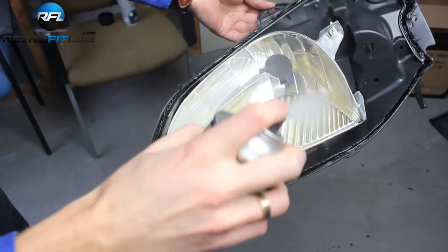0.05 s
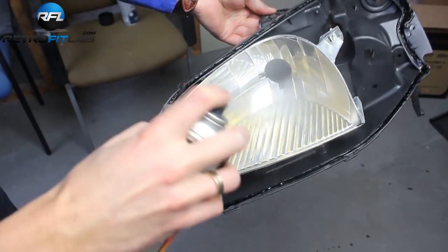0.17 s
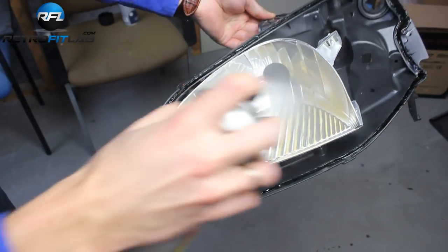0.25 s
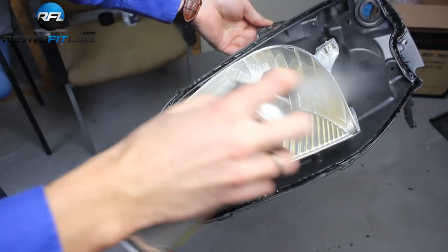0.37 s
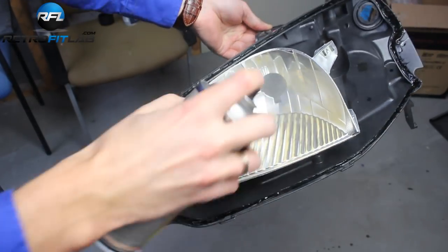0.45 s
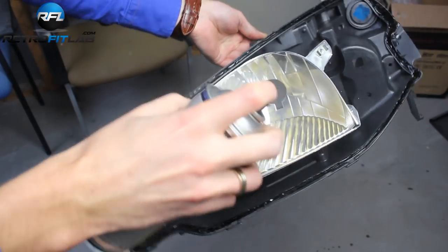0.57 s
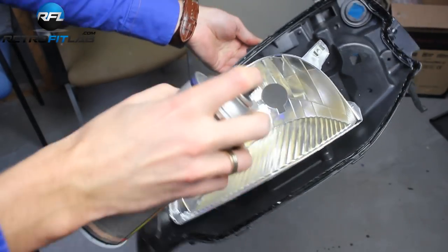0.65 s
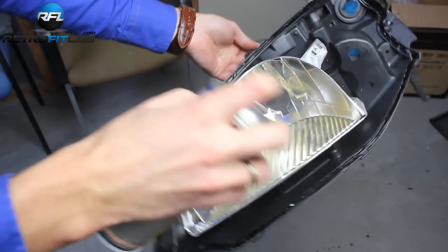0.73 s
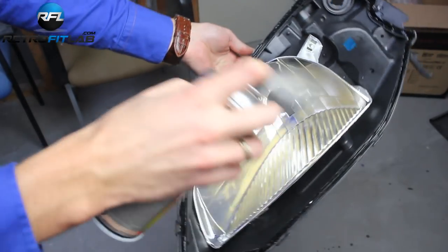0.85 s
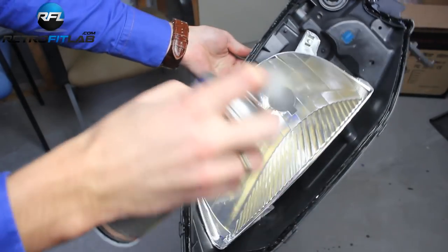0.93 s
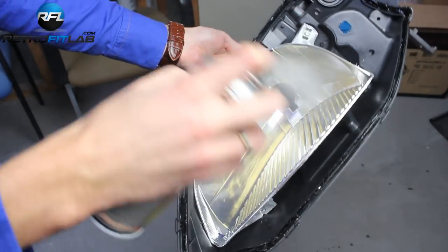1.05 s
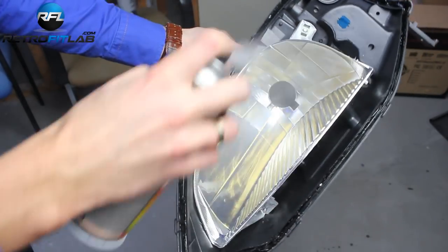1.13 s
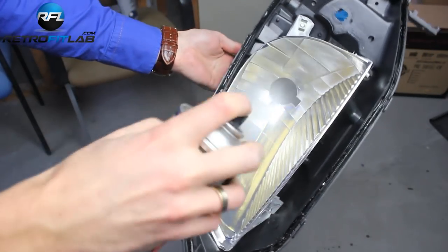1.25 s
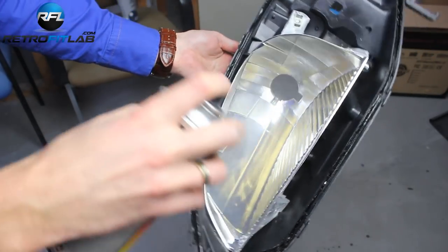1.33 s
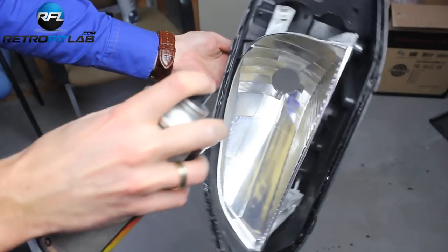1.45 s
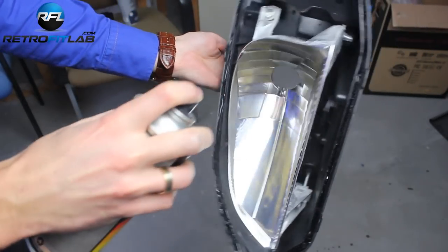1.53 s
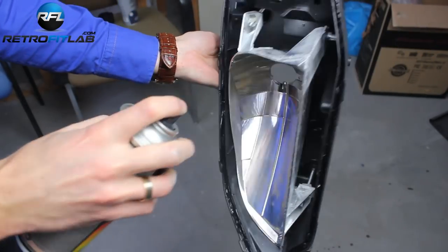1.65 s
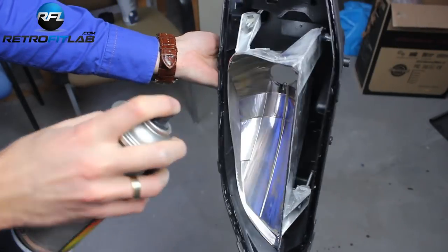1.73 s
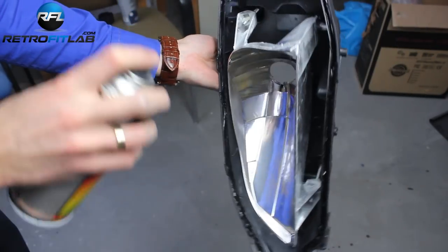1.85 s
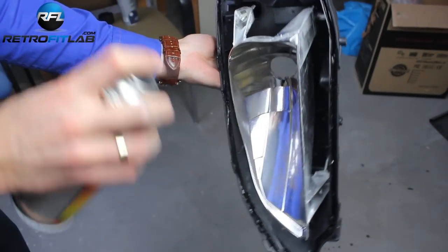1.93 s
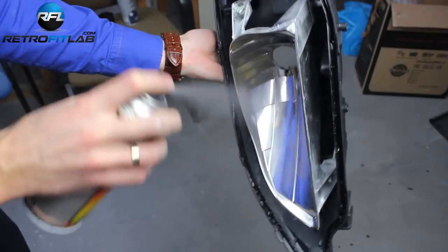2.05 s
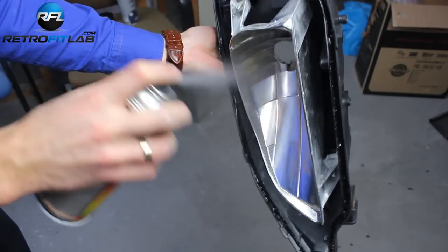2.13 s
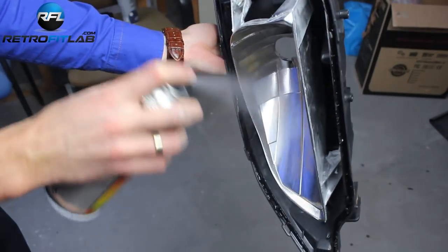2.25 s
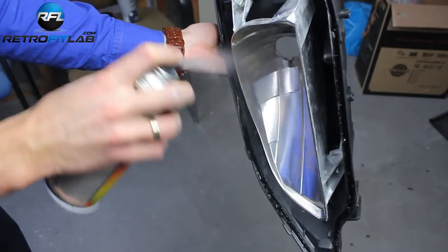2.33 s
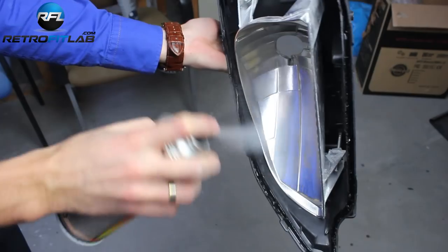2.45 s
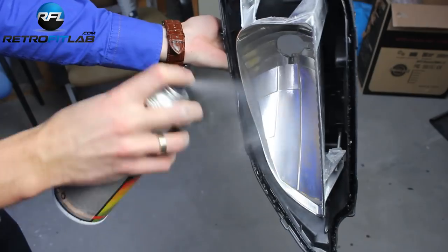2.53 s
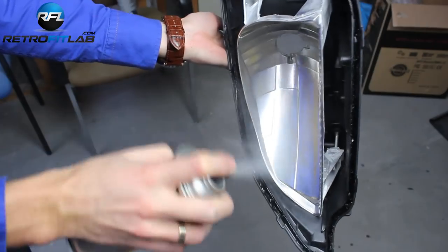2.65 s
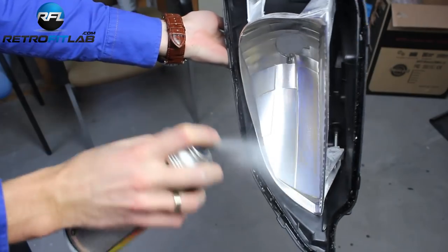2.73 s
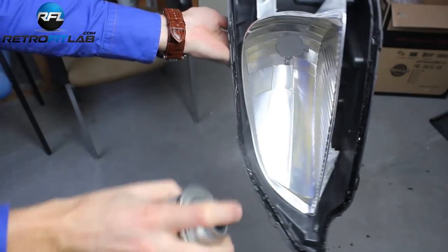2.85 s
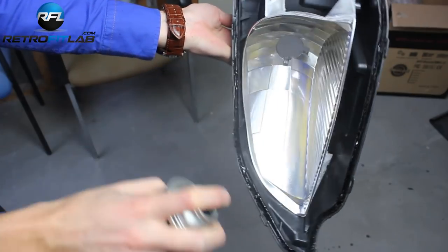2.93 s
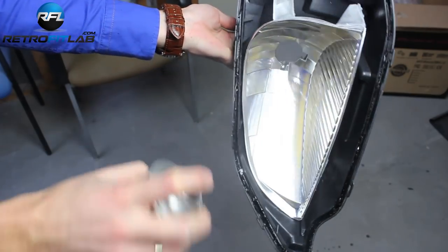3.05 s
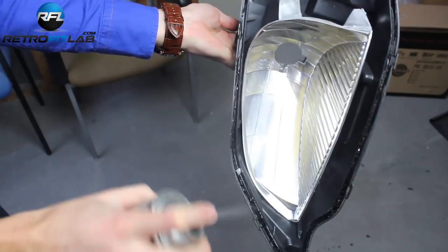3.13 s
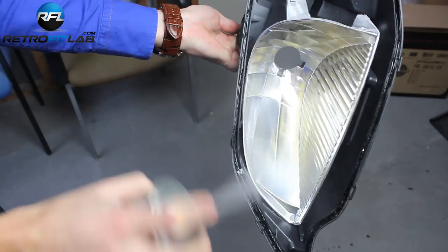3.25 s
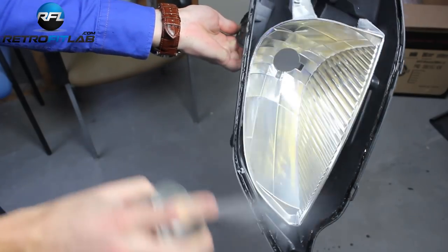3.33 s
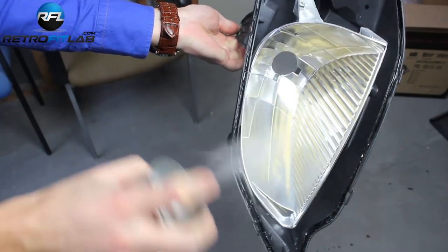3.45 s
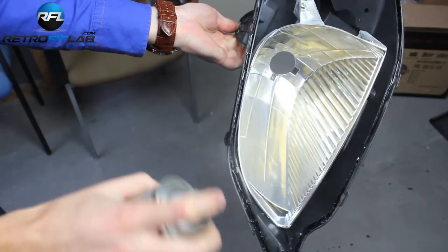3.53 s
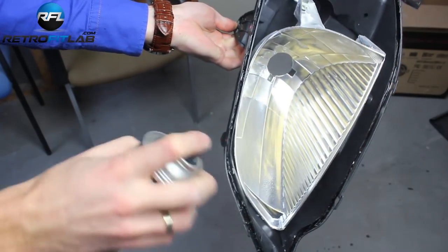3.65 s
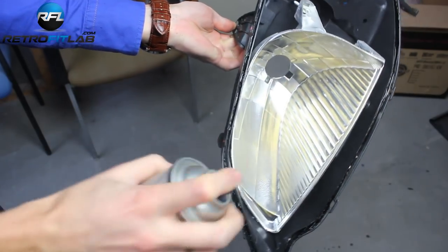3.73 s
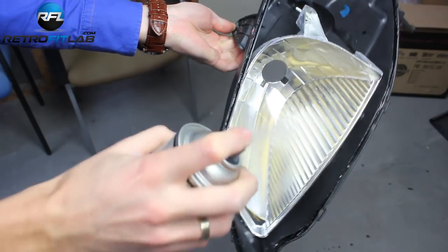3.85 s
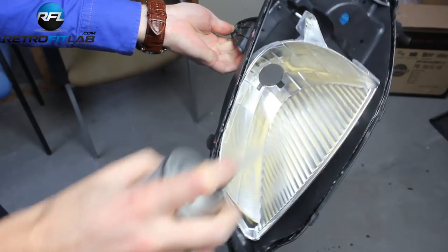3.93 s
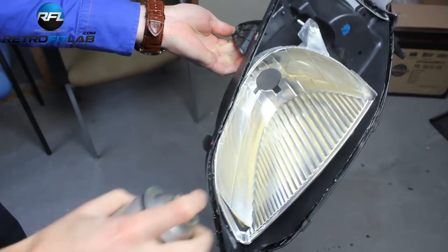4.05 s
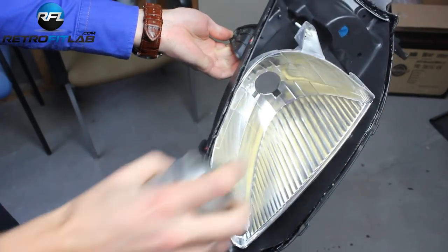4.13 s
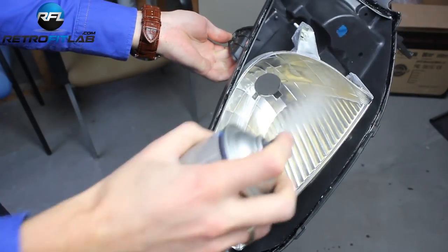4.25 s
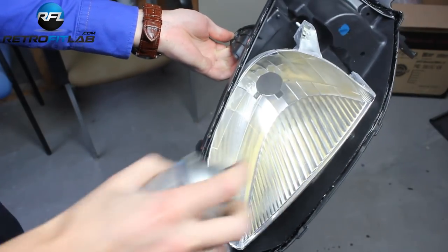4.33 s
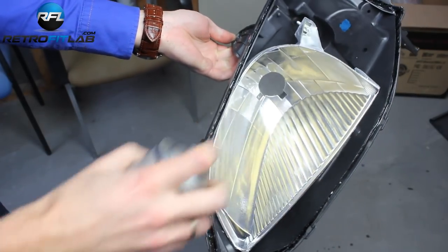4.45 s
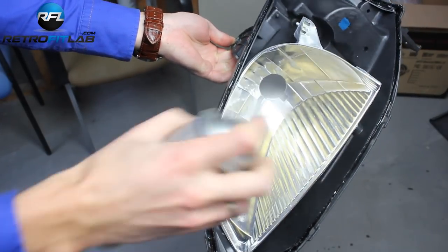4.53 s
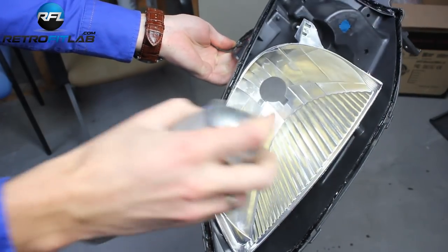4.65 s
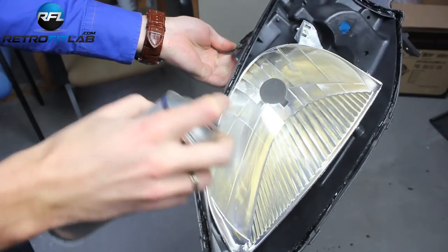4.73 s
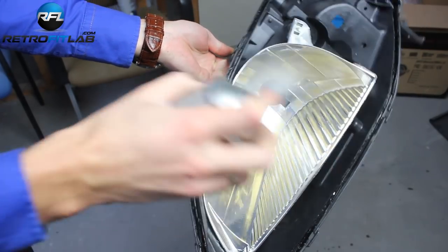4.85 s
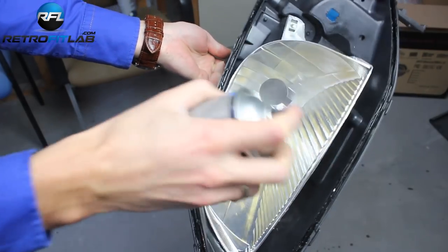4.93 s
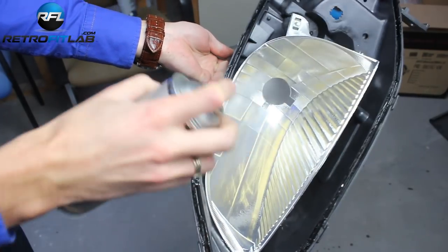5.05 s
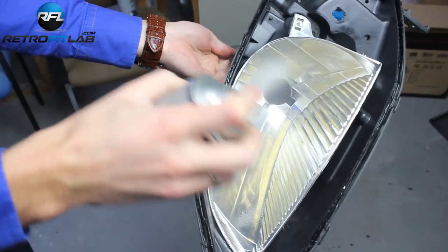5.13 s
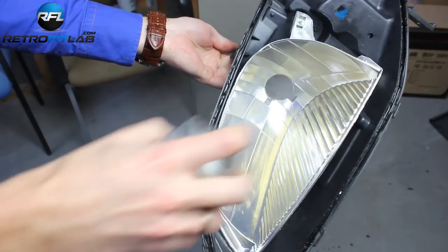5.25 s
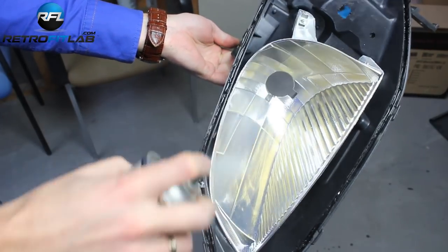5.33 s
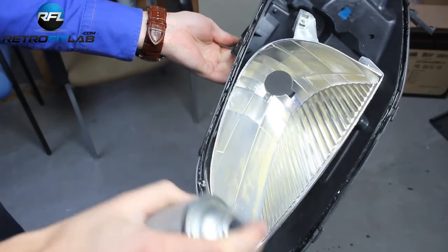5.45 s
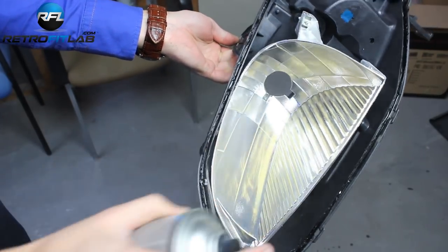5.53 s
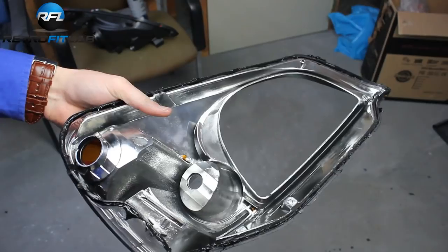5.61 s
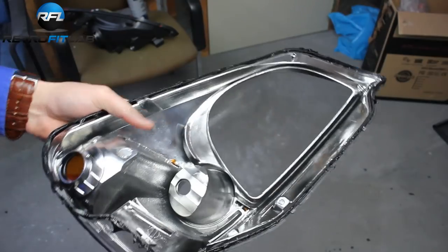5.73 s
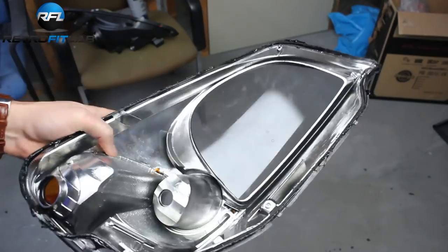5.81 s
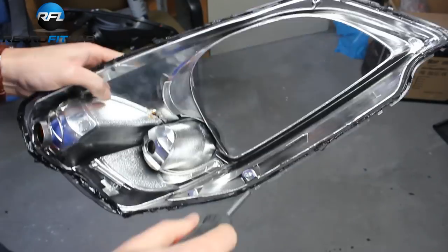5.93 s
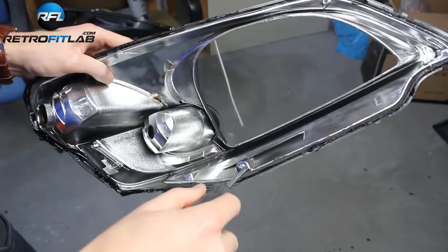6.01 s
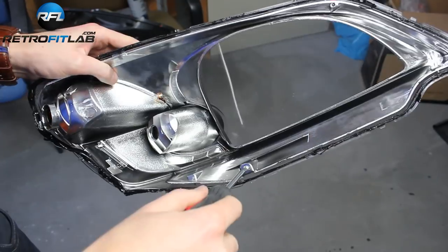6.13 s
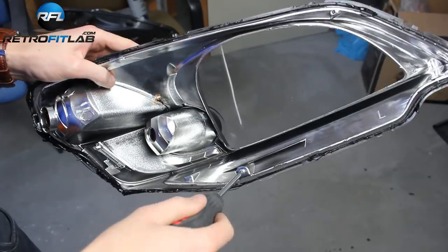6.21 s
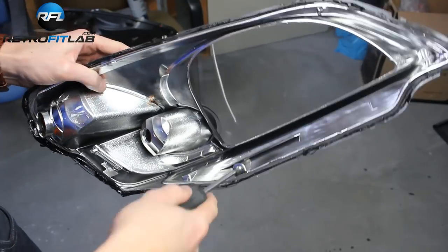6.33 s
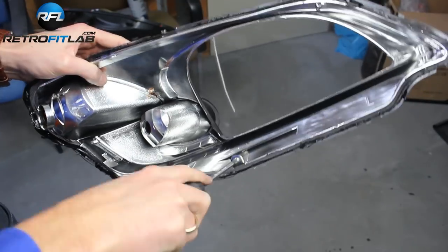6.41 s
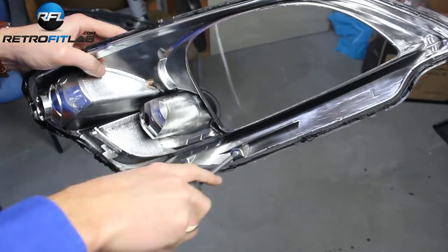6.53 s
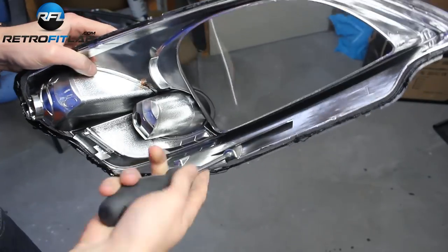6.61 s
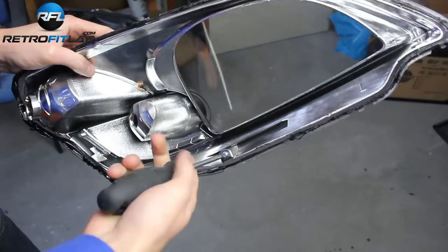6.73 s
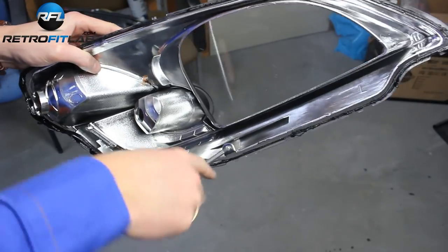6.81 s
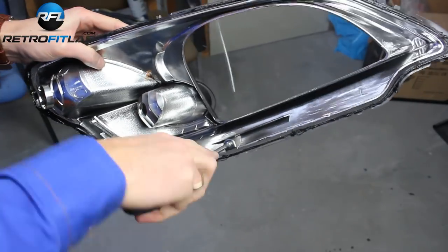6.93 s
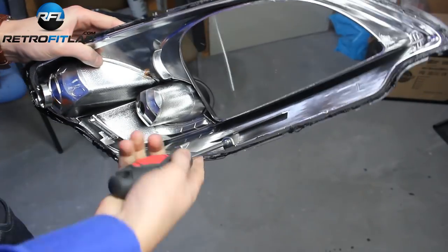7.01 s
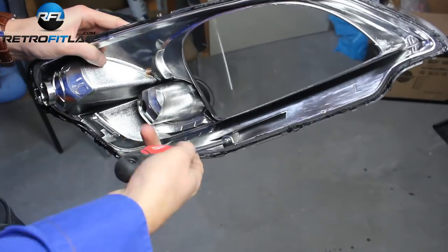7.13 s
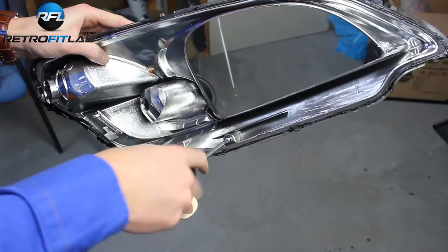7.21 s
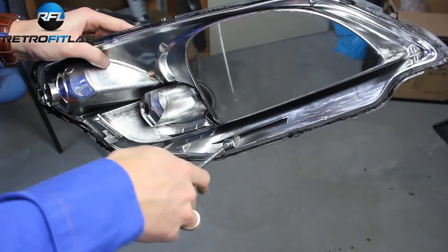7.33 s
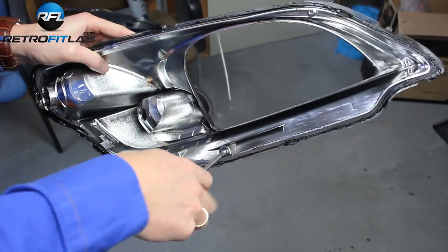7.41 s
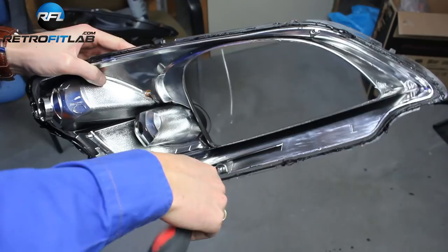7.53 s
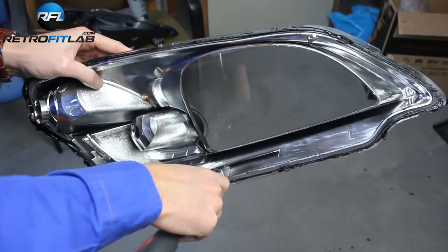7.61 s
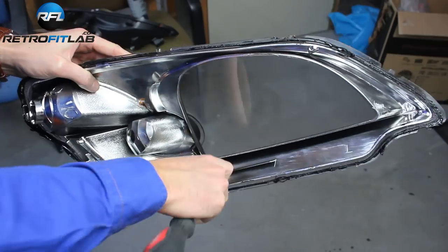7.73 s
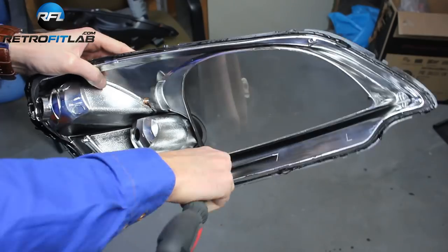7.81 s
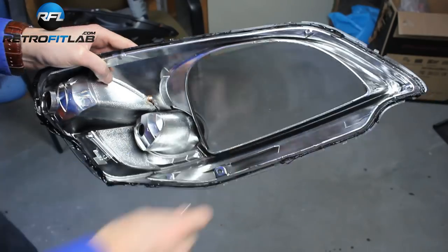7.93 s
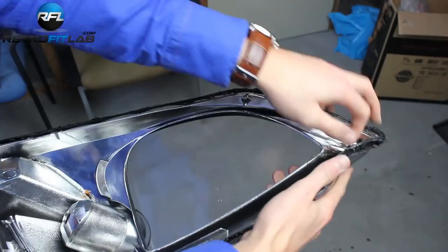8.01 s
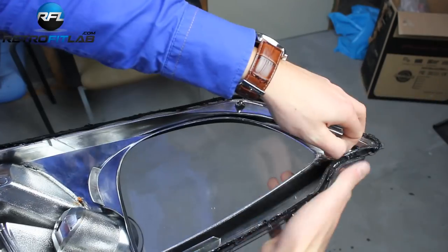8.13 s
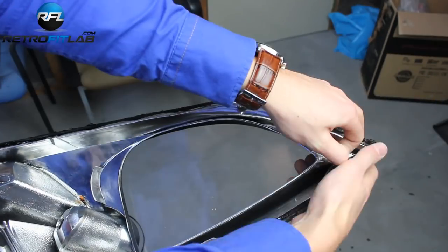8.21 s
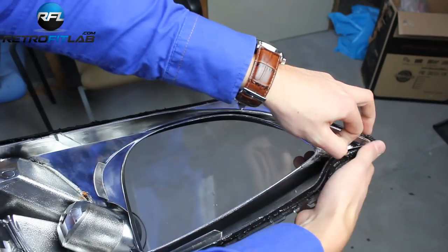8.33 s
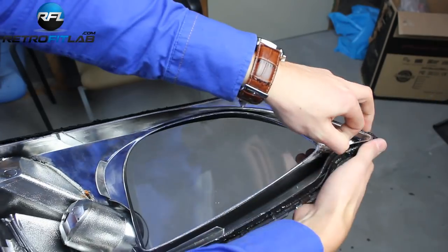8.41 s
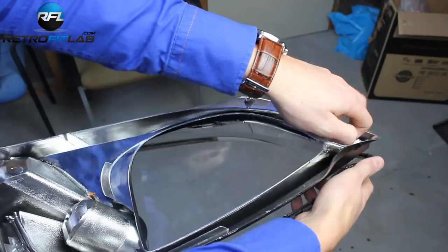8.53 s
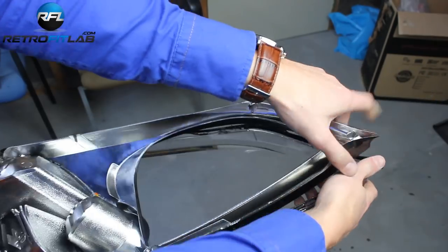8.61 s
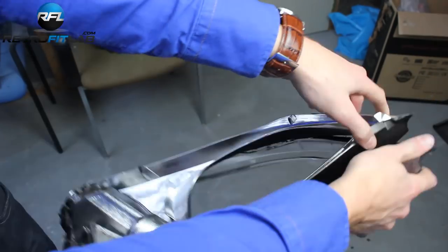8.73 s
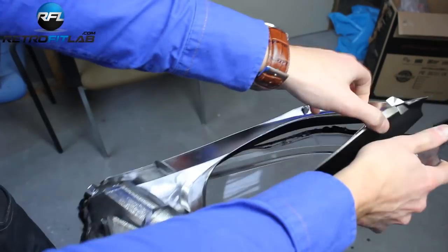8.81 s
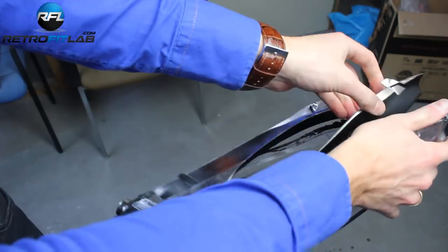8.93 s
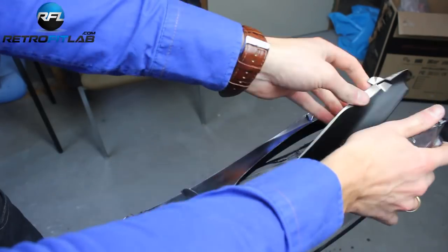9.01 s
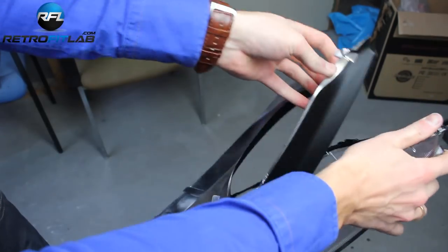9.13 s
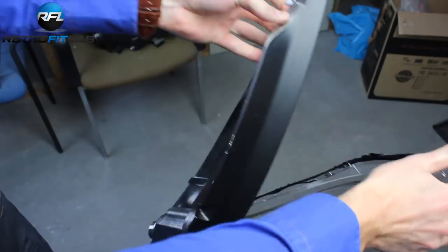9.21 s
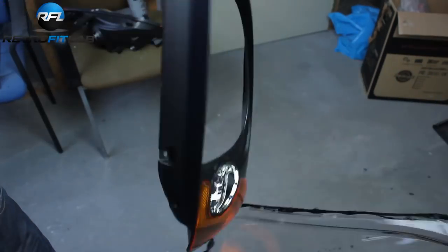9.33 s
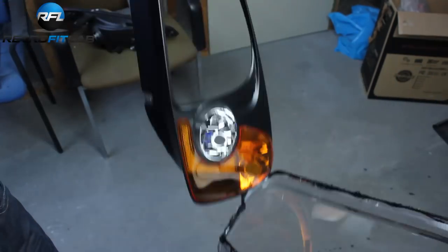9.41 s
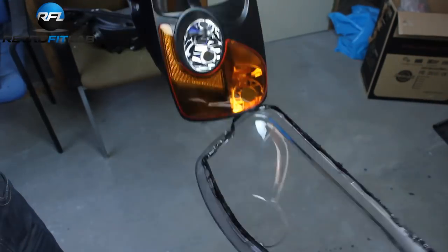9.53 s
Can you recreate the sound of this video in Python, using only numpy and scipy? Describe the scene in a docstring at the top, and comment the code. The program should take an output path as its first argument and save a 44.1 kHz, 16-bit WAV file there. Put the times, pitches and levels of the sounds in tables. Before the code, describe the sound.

Bright, crisp aerosol jets come first, some fluttering as they sweep across a plastic headlight part, with hard hollow knocks and a thin ringing roll of the ball inside the can. Later only handling remains: soft scuffs, small slipping clicks along a seam, and dull panel cracks. Close, mono microphone, short dull room reflections, steady then wavering mains hum.

```python
"""Hiss of an aerosol can, sprayed in short bursts at a plastic headlight: gated, coloured noise with echoes.
The mixing ball rolls, sings and knocks in the can: grains and struck modes of steel shell and hollow.
Then the plastic housing is prised and handled: friction noise scrapes, noise bursts and panel modes snap.
An electrical hum of steady, then wavering sines and a noise floor run under everything, in a workshop."""
import sys
import numpy as np
from scipy import signal
from scipy.fft import rfft, irfft, next_fast_len
from scipy.io import wavfile
from scipy.ndimage import uniform_filter1d, map_coordinates

SR = 44100
rng = np.random.default_rng(int(sys.argv[2]) if len(sys.argv) > 2 else 0)


def put_to_file(sound):
    """Save the sound as 16-bit audio at rate SR, in the file named by the first command-line argument."""
    columns = np.atleast_2d(sound).T  # one column per channel
    safe = np.clip(columns, -1, 1)
    whole_steps = np.round(safe * 32767)
    wavfile.write(sys.argv[1], SR, whole_steps.astype(np.int16))


N = 421596
TIME_S = np.arange(N) / SR
HIT_TIME_S = np.arange(SR // 4) / SR
SPRAY_END_S = 5.63

# Nozzle presses: (opens [s], closes [s], level [dB])
PRESSES = [(-0.2, 0.41, -41.5), (0.781, 1.238, -41.5), (1.928, 2.794, -41.5), (3.147, 3.479, -43.5),
           (3.701, 3.966, -42), (4.107, 4.292, -42), (4.454, 4.588, -42), (4.74, 4.909, -41),
           (5.032, 5.18, -41), (5.313, 5.437, -43)]
# How squarely the jet faces the part: (time [s], echo share [0-1])
FACING = [(1.2, 0.13), (2.1, 0), (2.8, 0.2), (3.2, 0.5), (3.9, 0.3), (4.3, 0.13)]
# Hiss swell as the jet sweeps along the part: (time [s], level [dB])
AIM = [(1.3, 0), (2.03, -2), (2.16, 2), (2.26, -1.5), (2.42, 1.2), (2.5, -1.2), (2.58, 1.5), (2.72, -1.5),
       (3.1, 0)]
# Hiss spectrum: (frequency [Hz], density [dB per Hz])
HISS_SPECTRUM = [(3000, -22.5), (5500, -3), (7500, 0), (8700, -2), (9600, 0.5), (10400, -0.5), (11400, 4.5),
                 (12600, 2.5), (13600, -2.5), (15000, 3.5), (16000, -18)]
# Lower rush spectrum: (frequency [Hz], density [dB per Hz])
RUSH_SPECTRUM = [(300, -21.5), (600, -19.5), (1000, -11.5), (1450, -9), (1950, -5.5), (2450, -6.5),
                 (3200, -3.5), (4300, 1), (7500, -3.5), (9500, -19)]
VALVE_OPEN_S, VALVE_SHUT_S = 0.043, 0.022
BUILD_DB, BUILD_S = 5, 0.1  # hiss starts this much weaker, builds up
RUSH_DB = -8  # relative to the hiss
DRIBBLE_DB, DRIBBLE_S = -24.5, 0.12  # gas left in the nozzle after closing

# Ball rolling as the hand sweeps the can: (time [s], patter level [dB])
ROLL = [(0.0, -59), (0.45, -58), (0.9, -62), (1.33, -64.5), (1.5, -75.5), (1.8, -79), (2.1, -63),
        (2.6, -81), (2.9, -65), (3.1, -71.5), (3.62, -74.5), (4.2, -55.5), (4.36, -66.5), (4.62, -54.5),
        (4.73, -62), (5.1, -60.5), (5.6, -56.5), (5.68, -82)]
# Ball swirling round the wall: (start [s], end [s], singing [dB], dry skidding [dB])
SWIRLS = [(0.188, 0.317, -60, -64), (0.838, 1.223, -59, -63.5), (1.822, 1.86, -68, -65),
          (2.64, 2.931, -49.5, -59), (2.967, 3.11, -68, -60.5), (3.533, 3.93, -71, -66.5)]
# Ball striking the can: (time [s], clack [dB], hollow knock [dB])
KNOCKS = [(0.0114, -38.5, -43), (0.114, -41, -41), (0.1308, -38, -41), (0.1746, -48, -43.5),
          (0.1986, -34, -49), (0.2164, -32.5, -47), (0.2881, -37.5, -51), (0.31, -40, -49),
          (0.371, -53, -38), (0.5, -32.5, -46.5), (0.5473, -30.5, -47), (0.567, -44, -58),
          (0.6478, -40.5, -39.5), (0.699, -38, -55), (0.7349, -42.5, -46), (0.7624, -44.5, -51),
          (0.814, -46, -50), (0.8451, -47, -55), (1.4111, -60, -75), (2.642, -33, -62),
          (2.6893, -38.5, -51), (2.746, -39, -60), (2.7885, -47, -68), (2.8697, -38.5, -54),
          (2.9366, -41, -62), (2.963, -48, -56), (4.0293, -49, -50.5), (4.072, -28, -40), (4.078, -27, -46),
          (4.115, -36.5, -47), (4.143, -36, -48), (4.1594, -37, -47), (4.204, -40, -52),
          (4.3963, -49, -44.5), (4.4188, -53.5, -43), (4.491, -29.5, -40), (4.5, -30.5, -39.5),
          (4.5534, -38, -49), (4.5936, -50, -41.5), (4.62, -50, -48), (4.8178, -30, -37),
          (4.8462, -36.5, -44.5), (4.93, -40, -39), (4.9575, -39, -37.5), (5.0144, -43.5, -35),
          (5.0403, -50, -44.5), (5.053, -44, -46.5), (5.1104, -30, -42), (5.1394, -29.5, -42.5),
          (5.204, -43, -41.5), (5.245, -45, -34.5), (5.266, -61, -43), (5.3042, -46, -44.5),
          (5.3154, -58, -40), (5.3404, -48, -40.5), (5.4014, -36, -47), (5.455, -30.5, -39),
          (5.5148, -45.5, -42.5), (5.545, -62, -49), (5.5845, -65, -44.5)]
# Steel shell modes, rolling damps them further: (frequency [Hz], level [dB], t60 [s])
SHELL_MODES = [(4422, 0, 0.071), (4490, -12, 0.041), (5140, -13, .04), (7300, -5, 0.11), (8220, -15, .08),
               (9840, -13.5, 0.082)]
# Can hollow modes, rolling damps them further: (frequency [Hz], level [dB], t60 [s])
HOLLOW_MODES = [(1100, -16, 0.022), (1723, 1, 0.041), (1990, 1.5, 0.021)]
# Clack and skid spectrum: (frequency [Hz], density [dB per Hz])
CLACK_SPECTRUM = [(100, -43.5), (400, -37), (1000, -19), (2400, -3.5), (3200, -2), (3800, -2.5),
                  (4600, 2.5), (5500, -1), (6500, -4), (7400, -6), (10000, -9.5), (12500, -10.5),
                  (15000, -8.5), (16500, -16.5)]
SING_DB, SKID_DB = -16.5, -1.5  # shell singing and dry skidding, relative to the patter
SWIRL_RISE_S, SWIRL_FALL_S = 0.039, 0.037
LAP_HZ, LAP_DB = 22, 2.5  # mean lap rate of the ball, throb depth of singing and skidding
KNOCK_BRIGHT_DB, KNOCK_BRIGHT_SLOPE = -3.5, 0.54  # clack treble, its rise per dB of clack over hollow
KNOCK_RING_DB = -23.5  # shell ring, relative to the clack
GLANCE_RING_DB = 1.5  # extra ring of a blow in a swirl, relative to the singing
TAPS_PER_S = 20
TAP_CLACK_DB, TAP_HOLLOW_DB = 2, 5.5  # mean light tap, relative to the patter

# Hum tones, levels while spraying: (frequency [Hz], level [dB rms])
HUM_TONES = [(100, -51), (186.2, -79), (213.8, -86.5), (288, -75), (303, -78), (313.8, -72), (1000, -69.5)]
# Tones beating with the hum until the spraying is over: (frequency [Hz], level [dB rms])
BEAT_TONES = [(113.8, -61.5), (86.2, -79)]
# Still air spectrum: (frequency [Hz], density [dB per Hz])
FLOOR_SPECTRUM = [(25, -3.5), (60, -1.5), (130, 10), (230, -1.5), (300, 5), (380, 0.5), (480, 1.5),
                  (700, -3.5), (1200, -7), (1700, -11.5), (2600, -14.5), (6000, -23), (15000, -32.5)]

# Hand and tool strokes: (start [s], end [s], scrape before treble [dB], scrape treble [dB], panel rumble [dB])
RUBS = [(5.753, 5.791, -60, 9, -75), (6.086, 6.235, -63, -14, -66), (6.35, 6.42, -62, 1, -73),
        (6.44, 6.592, -68, 3, -65), (6.652, 7.42, -75, -1.5, -68.5), (7.623, 7.644, -67, -5, -60),
        (7.754, 7.843, -71, -3, -70), (7.959, 8.07, -69, 0.5, -80), (8.132, 8.63, -78, 0, -71),
        (8.66, 8.745, -72.5, 0, -74.5), (9.317, 9.335, -62, -5, -62.5)]
# Panel rumble spectrum: (frequency [Hz], density [dB per Hz])
RUMBLE_SPECTRUM = [(60, -38), (200, -15), (330, -4), (420, -10), (580, -6.5), (850, -2.5), (1200, -7),
                   (2500, -44)]
RUB_RISE_S, RUB_FALL_S = 0.013, 0.031
HOLD_SCRAPE_DB, HOLD_RUMBLE_DB = -83.5, -81.5  # fingers shifting between strokes

# Housing snaps and creaks: (time [s], crack [dB], panel thud [dB])
SNAPS = [(5.7026, -52, -61), (5.7671, -58, -61), (5.78, -50.5, -83), (5.9006, -56.5, -56.5),
         (5.9567, -56.5, -65), (5.976, -54.5, -63), (6.0705, -51, -43.5), (6.08, -46, -53),
         (6.0875, -47, -55), (6.1583, -66, -53), (6.219, -56, -70), (6.2311, -42, -40),
         (6.2455, -48, -41.5), (6.2828, -51.5, -71), (6.3228, -43.5, -60), (6.333, -43.5, -67),
         (6.3506, -44, -58), (6.3702, -53, -70), (6.3868, -49, -71), (6.408, -55, -72),
         (6.4746, -54, -51.5), (6.4849, -52.5, -54), (6.5097, -56.5, -55.5), (6.616, -55, -52.5),
         (6.7676, -49.5, -55.5), (6.8886, -61, -53.5), (6.957, -62, -60), (7.41, -62.5, -65),
         (7.5336, -61, -46.5), (7.6178, -54.5, -66), (7.721, -62, -78), (7.761, -59, -54),
         (7.8563, -58, -52.5), (8.0732, -64, -50), (8.091, -64, -54), (8.1642, -47.5, -48.5),
         (8.2483, -57.5, -60), (8.278, -45.5, -41.5), (8.356, -42, -44), (8.3939, -47, -51.5),
         (8.4339, -45, -49), (8.4969, -53, -47.5), (8.5055, -42, -39.5), (8.5528, -45, -37),
         (8.5611, -55, -41.5), (8.7629, -47.5, -53), (8.8609, -50.5, -45.5), (9.1158, -61.5, -44),
         (9.1275, -53, -61), (9.1483, -63, -55.5)]
# Tool working along the seam in small slips, one row: (start [s], end [s], mean crack [dB], mean thud [dB])
SEAM = (6.52, 7.5, -69.5, -63.5)
# Panel pitch as the grip moves: (time [s], pitch factor [1])
GRIP = [(6.2, 0.87), (6.8, 0.96), (7.55, 0.8), (7.8, 1.02), (8.55, 1), (9.1, 1.006)]
# Plastic panel modes, before the grip shifts them: (frequency [Hz], level [dB], t60 [s])
PANEL_MODES = [(305, -5.5, 0.051), (433, -6.5, 0.078), (518, 3.5, 0.036), (599, 5.5, 0.035),
               (729, -3.5, 0.067), (915, -5.5, 0.057), (1360, -13, 0.068)]
# Crack and scuff spectrum: (frequency [Hz], density [dB per Hz])
CRACK_SPECTRUM = [(100, -38), (500, -8), (1000, -3.5), (1350, -2.5), (1750, -4), (2300, 0), (2800, -1.5),
                  (4300, -2.5), (6000, -7), (8000, -13), (12000, -11.5), (16000, -19)]
# Thud filter, small panels radiate little bass: (frequency [Hz], gain [dB])
THUD_TONE = [(120, -11), (220, -9), (330, -2), (480, -1.5), (1000, 0.5), (3000, -9)]
SLIPS_PER_S = 21
SNAP_BRIGHT_DB, SNAP_BRIGHT_SLOPE = -6, 0.7  # crack treble, its rise per dB of crack over thud
TICK_DB = -5.5  # first sharp edge, relative to the crack at neutral treble


def undb(db):
    """Decibels to gain."""
    return 10 ** (np.asarray(db) / 20)


def curves(table):
    """Columns of a table, interpolated linearly in time."""
    s, *columns = np.transpose(table)
    return [np.interp(TIME_S, s, column) for column in columns]


def level(x, db, span_s=N / SR):
    """Scale x so that its energy, spread over span_s, has this rms level; db may vary in time."""
    return x * undb(db) * np.sqrt(span_s * SR / np.sum(x ** 2))


def colour(x, points, bright_db=0):
    """Minimum-phase filter through (Hz, dB) points, plus a treble shelf of bright_db."""
    size = next_fast_len(len(x))
    size += size % 2
    f_hz = np.maximum(np.arange(size // 2 + 1) * SR / size, 1)
    hz, db = np.transpose(points)
    shelf_db = bright_db / (1 + (6000 / f_hz) ** 3)
    gain_db = np.interp(np.log(f_hz), np.log(hz), db) + shelf_db
    # fold the cepstrum: causal response
    cepstrum = irfft(np.log(undb(gain_db)))
    cepstrum[1:size // 2] *= 2
    cepstrum[size // 2 + 1:] = 0
    return irfft(rfft(x, size) * np.exp(rfft(cepstrum)))[:len(x)]


def walk(rate_hz):
    """Random values held 1 / rate_hz and slewed twice; unit spread."""
    hold = int(SR / rate_hz)
    held = np.repeat(rng.standard_normal(N // hold + 1), hold)
    slewed = uniform_filter1d(uniform_filter1d(held, hold), hold)[:N]
    return slewed / slewed.std()


def grains(rate, spread_db):
    """Tiny impacts at random moments, rate per second, a few much larger than the rest."""
    sizes = undb(spread_db * np.minimum(rng.exponential(size=N), 4))
    return (rng.random(N) < rate / SR) * sizes * rng.choice([-1, 1], N)


def fade(t60_s):
    """Exponential decay of one blow, 60 dB in t60_s."""
    return np.exp(-np.log(1000) * HIT_TIME_S / t60_s)


def burst(t60_s, rise_s):
    """Dense contact noise: quick build-up, exponential decay."""
    rise = np.tanh((HIT_TIME_S / rise_s) ** 2)
    return rng.standard_normal(len(HIT_TIME_S)) * fade(t60_s) * rise


def ring(modes, detune, scatter_db):
    """Modes struck once; each point of contact weights and shifts them a little."""
    out = np.zeros(len(HIT_TIME_S))
    for hz, db, t60_s in modes:
        weight, shift, sign = rng.standard_normal(3)
        gain = np.sign(sign) * undb(db + scatter_db * weight)
        phase = 2 * np.pi * hz * (1 + detune * shift) * HIT_TIME_S
        out += gain * fade(t60_s) * np.sin(phase)
    return out


def add(track, s, sound):
    """Mix a sound into the track at time s."""
    start = max(int(s * SR), 0)
    track[start:start + len(sound)] += sound[:N - start]


def spot(points, ripple_db):
    """Random peaks and dips of one contact spot around a common spectrum."""
    hz, db = np.transpose(points)
    fine_hz = np.geomspace(hz[0], hz[-1], 60)
    common_db = np.interp(np.log(fine_hz), np.log(hz), db)
    return np.c_[fine_hz, common_db + ripple_db * rng.standard_normal(len(fine_hz))]


def delayed(x, lag_s):
    """Read x through a delay that may move."""
    return map_coordinates(x, [(TIME_S - lag_s) * SR], order=3)


def stroke(start_s, end_s, rise_s, fall_s):
    """Smooth attack from start, hold until end, exponential release."""
    rise = np.clip((TIME_S - start_s) / rise_s, 0, 1)
    return np.sin(np.pi / 2 * rise) ** 2 * np.exp(-np.clip((TIME_S - end_s) / fall_s, 0, 20))


def valve():
    """Gas flow through the nozzle over all presses, and the hiss, which builds up during each."""
    flow, hiss_gain = np.zeros(N), np.zeros(N)
    for opens_s, closes_s, db in PRESSES:
        main = stroke(opens_s, closes_s, VALVE_OPEN_S, VALVE_SHUT_S)
        dribble = undb(DRIBBLE_DB) * stroke(opens_s, closes_s, VALVE_OPEN_S, DRIBBLE_S)
        press = undb(db) * (main + dribble)
        flow += press
        hiss_gain += press * undb(-BUILD_DB * np.exp(-np.maximum(TIME_S - opens_s, 0) / BUILD_S))
    return flow, hiss_gain


def jet():
    """Turbulent gas with spitting droplets; the part reflects it over a changing distance."""
    flow, hiss_gain = valve()
    facing, = curves(FACING)
    aim_db, = curves(AIM)
    droplets = level(grains(rate=1200, spread_db=4.5), -7)
    hiss = colour(rng.standard_normal(N) + droplets, HISS_SPECTRUM)
    rush = colour(rng.standard_normal(N) + droplets, RUSH_SPECTRUM)
    # nearest echo hollows out the lower rush
    near_lag_s = 0.0008 * np.exp(0.045 * walk(3))
    rush = rush - np.clip(facing, 0, 1) * delayed(rush, near_lag_s)
    hiss = hiss_gain * undb(aim_db) * level(hiss, 0.54 + 0.97 * walk(30))
    rush = flow * level(rush, RUSH_DB)
    direct = (hiss + rush) * undb(1.12 * walk(60))
    # later echoes off hand and housing ripple the spectrum unevenly
    echoes = np.zeros(N)
    for lag_s in (0.0013, 0.0023, 0.0037, 0.0059):
        echoes += delayed(direct, lag_s * np.exp(0.05 * walk(2.5)))
    return direct - 0.24 * echoes


def swirling():
    """Gains of the singing and of the skidding, ball swirling round the wall."""
    return sum(undb([[sing_db], [skid_db]]) * stroke(start_s, end_s, SWIRL_RISE_S, SWIRL_FALL_S)
               for start_s, end_s, sing_db, skid_db in SWIRLS)


def ball_roll():
    """Rolling ball and sloshing paint patter on the hollow; skidding round the wall makes the steel sing."""
    roll_db, = curves(ROLL)
    lap_phase = 2 * np.pi * np.cumsum(LAP_HZ * (1 + 0.3 * walk(15))) / SR  # uneven laps
    singing, skidding = swirling() * undb(LAP_DB * np.sin(lap_phase))
    cavity = ring(HOLLOW_MODES, detune=0, scatter_db=0) * fade(t60_s=0.02)
    wall = ring(SHELL_MODES, detune=0, scatter_db=0) * fade(t60_s=0.12)
    hollow = signal.fftconvolve(grains(rate=830, spread_db=3.0), cavity)[:N]
    shell = signal.fftconvolve(grains(rate=2200, spread_db=2.5), wall)[:N]
    skid = colour(grains(rate=1800, spread_db=4.5), CLACK_SPECTRUM, bright_db=-1.5)
    # moving paint loads the can and bends its pitch a little
    hollow = delayed(hollow, 0.00031 * walk(50))
    shell = delayed(shell, 0.00005 * walk(110))
    patter = level(hollow, roll_db + 1.5 * walk(40))
    sing = level(shell, 1.5 * walk(35)) * (singing + undb(roll_db + SING_DB))
    skid = level(skid, 5.3 * walk(50)) * (skidding + undb(roll_db + SKID_DB))
    return patter + sing + skid


def light_taps():
    """Chance touches of the ball until the spraying ends, as strong as it rolls; rows like KNOCKS."""
    chance = rng.random((int(TAPS_PER_S * SPRAY_END_S), 3))
    s = SPRAY_END_S * chance[:, 0]
    roll_db = np.interp(s, *np.transpose(ROLL))
    clack_db = roll_db + TAP_CLACK_DB + 10 * (chance[:, 1] - 0.5)
    hollow_db = roll_db + TAP_HOLLOW_DB + 10 * (chance[:, 2] - 0.5)
    return np.c_[s, clack_db, hollow_db]


def ball_knocks():
    """Blows: hard clack, short hollow knock, thin steel ring; blows cushioned by paint are duller."""
    out = np.zeros(N)
    singing = swirling()[0]
    for s, clack_db, hollow_db in [*KNOCKS, *light_taps()]:
        bright_db = KNOCK_BRIGHT_DB + KNOCK_BRIGHT_SLOPE * (clack_db - hollow_db)
        contact = burst(t60_s=0.015, rise_s=0.0005) + undb(-19.5) * burst(t60_s=0.16, rise_s=0.0012)
        clack = colour(contact, spot(CLACK_SPECTRUM, ripple_db=3.0), bright_db)
        hollow = ring(HOLLOW_MODES, detune=0.04, scatter_db=3.0)
        shell = ring(SHELL_MODES, detune=0.008, scatter_db=5)
        ring_gain = undb(clack_db + KNOCK_RING_DB) + undb(GLANCE_RING_DB) * singing[int(s * SR)]
        add(out, s - 0.0003, level(clack, clack_db, span_s=0.0088))
        add(out, s, level(hollow, hollow_db, span_s=0.0077))
        add(out, s, ring_gain * level(shell, 0, span_s=0.058))
    return out


def hum():
    """Sines that throb evenly during the spraying; then they skip, grow a little louder and waver."""
    late = np.clip((TIME_S - SPRAY_END_S) / 0.0029, 0, 1)
    waver = np.tanh(walk(20))
    out = np.zeros(N)
    for hz, db in HUM_TONES:
        drift_hz = late * (1.225 + 4.8 * (hz / 100) ** 0.355 * waver)
        swell_db = late * 2.35 * (100 / hz)
        phase = 2 * np.pi * np.cumsum(hz + drift_hz) / SR - 3.3 * late  # skip [rad]
        out += undb(db + swell_db) * np.sin(phase)
    for hz, db in BEAT_TONES:
        out += (1 - late) * undb(db) * np.sin(2 * np.pi * hz * TIME_S)
    return np.sqrt(2) * out  # rms to peak


def still_air():
    """Broadband noise floor, slightly unsteady."""
    return level(colour(rng.standard_normal(N), FLOOR_SPECTRUM), -69 + 0.5 * walk(12))


def housing_rub():
    """Fingers and tool slide from spot to spot, each scuffing in its own fits; the panels rumble with it."""
    scrape_gain, rumble_gain = undb(HOLD_SCRAPE_DB), undb(HOLD_RUMBLE_DB)
    treble_db = np.zeros(N)
    for start_s, end_s, scrape_db, bright_db, rumble_db in RUBS:
        push = stroke(start_s, end_s, RUB_RISE_S, RUB_FALL_S)
        treble_db += bright_db * push
        scrape_gain = np.maximum(scrape_gain, undb(scrape_db) * push)
        rumble_gain = np.maximum(rumble_gain, undb(rumble_db) * push)
    scuffs = np.zeros(N)
    for _ in range(5):  # contact spots
        friction = rng.standard_normal(N) + level(grains(rate=180, spread_db=4), 1)
        scuff = colour(friction, spot(CRACK_SPECTRUM, ripple_db=6.5), bright_db=2.5)
        scuffs += scuff * undb(13.0 * np.tanh(walk(30)))
    scuffs = level(scuffs, 2.7 * walk(40))
    high_pass = signal.butter(2, 5000, "highpass", fs=SR, output="sos")
    treble = signal.sosfiltfilt(high_pass, scuffs)
    scuffs = scuffs + (undb(treble_db) - 1) * treble
    slips = signal.fftconvolve(grains(rate=150, spread_db=3.5), burst(t60_s=0.012, rise_s=0.0005))[:N]
    rumble = colour(level(slips, 0) + level(rng.standard_normal(N), -6.5), RUMBLE_SPECTRUM)
    rumble = level(rumble, 2.3 * walk(45))
    handling = np.clip((TIME_S - SPRAY_END_S) / 0.1, 0, 1) ** 2
    return handling * (scrape_gain * scuffs + rumble_gain * rumble)


def seam_slips():
    """The tool sticks and slips at a loose pace; rows like SNAPS."""
    start_s, end_s, crack_db, thud_db = SEAM
    chance = rng.standard_normal((int((end_s - start_s) * SLIPS_PER_S), 3))
    s = start_s + (np.arange(len(chance)) + 0.19 * chance[:, 0]) / SLIPS_PER_S
    return np.c_[s, crack_db + 3 * chance[:, 1], thud_db + 2 * chance[:, 2]]


def housing_snaps():
    """Plastic creeps, then lets go: crack, scuff, and slips that shake the panels; heavy ones are duller."""
    out = np.zeros(N)
    for s, crack_db, thud_db in [*SNAPS, *seam_slips()]:
        bright_db = SNAP_BRIGHT_DB + SNAP_BRIGHT_SLOPE * (crack_db - thud_db)
        tone = spot(CRACK_SPECTRUM, ripple_db=2.0)
        crack = colour(burst(t60_s=0.023, rise_s=0.0015), tone, bright_db + 4.5)
        scuff = colour(burst(t60_s=0.051, rise_s=0.012), tone, bright_db - 6.0)
        tick = burst(t60_s=0.004, rise_s=0.00023)
        pitch = np.interp(s, *np.transpose(GRIP))
        modes = [(hz * pitch, db, t60_s) for hz, db, t60_s in PANEL_MODES]
        panel = ring(modes, detune=0.046, scatter_db=2.5)
        thud = colour(signal.fftconvolve(panel, burst(t60_s=0.02, rise_s=0.00063)), THUD_TONE)
        add(out, s - 0.0004, level(crack, crack_db, span_s=0.0088))
        add(out, s, level(tick, crack_db + TICK_DB + bright_db / 2, span_s=0.005))
        add(out, s - 0.006, level(scuff, crack_db - 5.5, span_s=0.0095))
        add(out, s - 0.001, level(thud, thud_db, span_s=0.014))
    return out


def workshop(x, wet_db, t60_s):
    """Dull, scattered reflections from floor, shelves and boxes: a decaying noise tail."""
    t = np.arange(SR // 2) / SR
    tail = rng.standard_normal(len(t)) * np.exp(-np.log(1000) * t / t60_s) * (t > 0.004)
    tail = tail / np.sqrt(np.sum(tail ** 2))
    tail = colour(tail, [(200, -5.5), (2000, 0), (6000, -1), (15000, -29)])  # (Hz, dB)
    return x + undb(wet_db) * signal.fftconvolve(x, tail)[:N]


def scene():
    """Can and housing in the room, over hum and still air; both channels alike."""
    near = jet() + ball_roll() + ball_knocks() + housing_rub() + housing_snaps()
    mono = workshop(near, wet_db=-19.5, t60_s=0.19) + hum() + still_air()
    return np.array([mono, mono])


def record(dry):
    """Thin the lowest bass below 45 Hz, cut the top above 16 kHz."""
    bass_cut = signal.butter(2, 45, "highpass", fs=SR, output="sos")
    top_cut = signal.ellip(10, 0.2, 70, 16000, fs=SR, output="sos")
    return signal.sosfilt(top_cut, signal.sosfilt(bass_cut, dry))


dry = scene()
out = record(dry)
put_to_file(out)
```